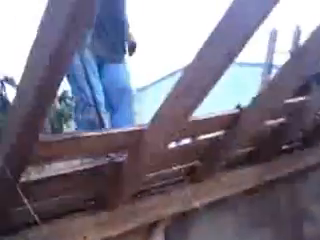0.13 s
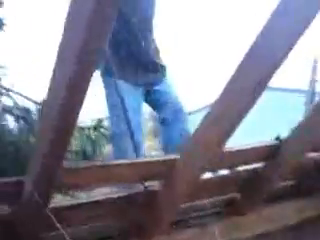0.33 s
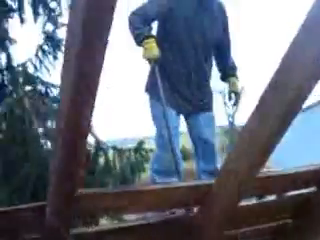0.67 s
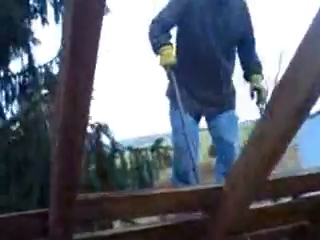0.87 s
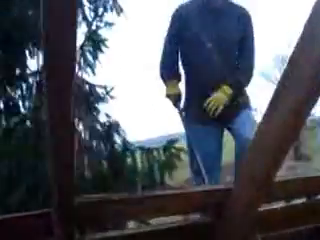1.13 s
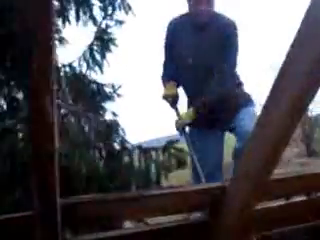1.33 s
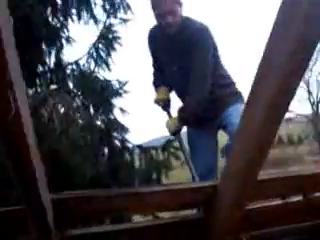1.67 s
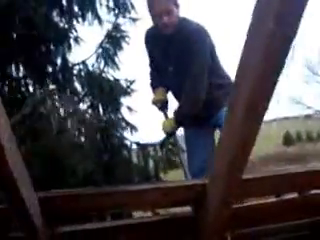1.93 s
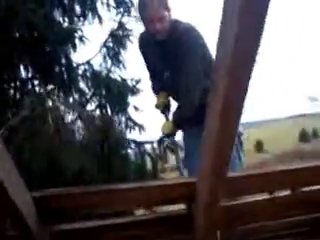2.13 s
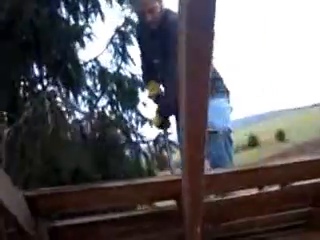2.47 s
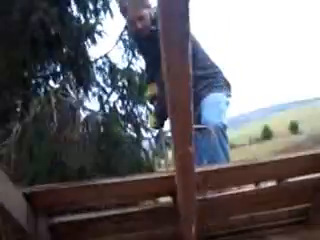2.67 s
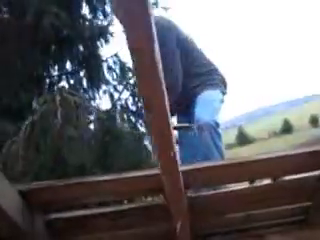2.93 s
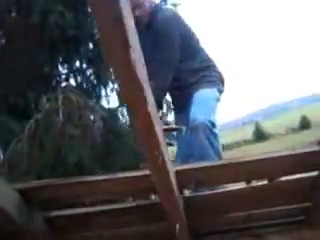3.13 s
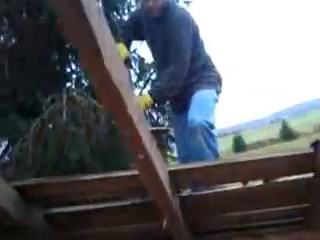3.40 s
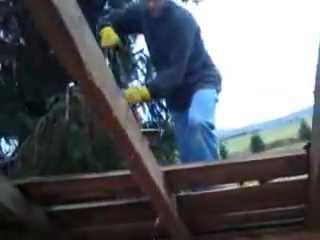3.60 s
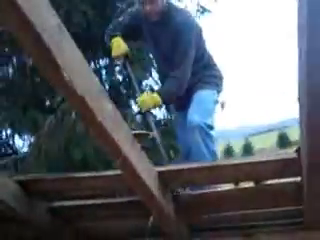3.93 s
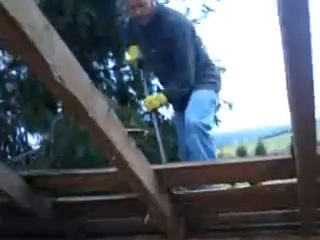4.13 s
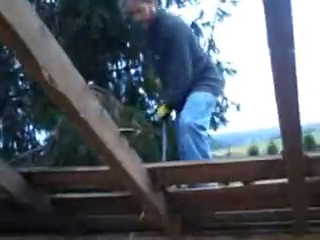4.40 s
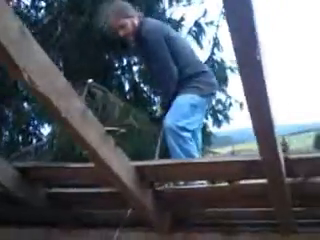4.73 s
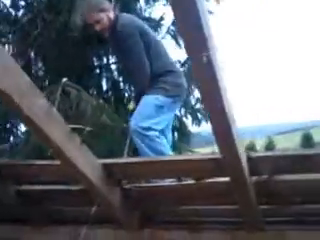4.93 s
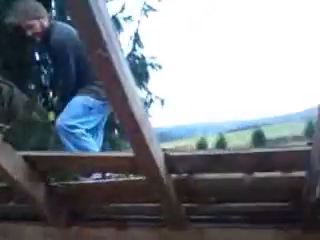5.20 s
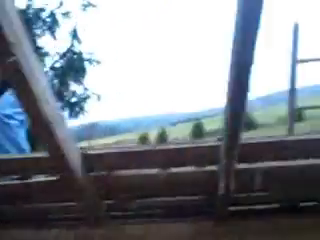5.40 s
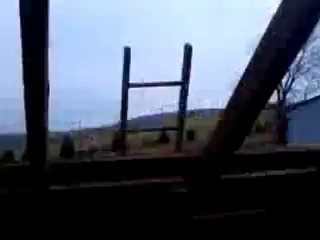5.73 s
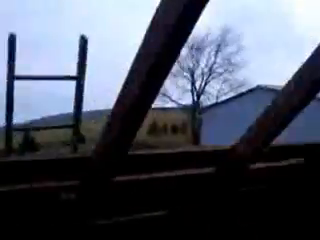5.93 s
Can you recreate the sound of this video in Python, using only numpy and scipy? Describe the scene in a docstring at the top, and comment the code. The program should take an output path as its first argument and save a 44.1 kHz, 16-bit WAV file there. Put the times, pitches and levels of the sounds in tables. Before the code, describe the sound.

Wooden boards are pried loose from an open barn roof, over uneven scraping of wood on wood and a faint hush of trees. Light knocks and small dry snaps open the first half second. Near 0.9, 1.8 and 2.9 seconds, boards strike the rafters hard, each blow ringing briefly and trailing into a rattle. Smaller knocks and a snap fall around 1.2 seconds, and soft, muffled low bumps join after 2 seconds. From 3.6 seconds to the end, boards fall and clatter in dense clusters, strongest around 3.9 to 4.2 seconds and again from 5 to 5.2 seconds. Wind thumps the microphone most near 5.2 seconds, along with louder scraping. A last hard crack with a low bump lands near 5.9 seconds. The small microphone gives a narrow sound with little treble, and the loudest blows distort slightly.

```python
"""Roof boards of an open barn are prised loose with a bar, over scraping wood and a hush of trees.
Light knocks and dry snaps come first; near 0.9, 1.8 and 2.9 s boards strike the rafters hard and ring.
Muffled low bumps join after 2 s. From 3.6 s to the end, boards fall and clatter in dense clusters;
wind thumps the microphone most near 5.2 s. Its narrow band ends near 5 kHz; the loudest blows clip."""
import sys
import numpy as np
from scipy import signal
from scipy.fft import rfft, irfft, next_fast_len
from scipy.io import wavfile
from scipy.ndimage import uniform_filter1d, map_coordinates

SR = 44100
rng = np.random.default_rng(int(sys.argv[2]) if len(sys.argv) > 2 else 0)


def put_to_file(sound):
    """Save the sound as 16-bit audio at rate SR, in the file named by the first command-line argument."""
    columns = np.atleast_2d(sound).T  # one column per channel
    safe = np.clip(columns, -1, 1)
    whole_steps = np.round(safe * 32767)
    wavfile.write(sys.argv[1], SR, whole_steps.astype(np.int16))


N = 267687

# Wind on the microphone. Each row: time in seconds, thump level in dB.
WIND_LEVELS = [(0.0, -47.5), (1.27, -43), (1.59, -50.5), (2.72, -50.5), (2.84, -44), (3.43, -52),
               (4.16, -40.5), (4.68, -51), (4.95, -49), (5.15, -26), (5.58, -49), (6.07, -42.5)]
# Wind thump spectrum. Each row: frequency in Hz, density in dB.
THUMP_SPECTRUM = [(15, -33), (40, -23.5), (150, -10.5), (220, -5.5), (300, -5), (420, -12), (600, -6),
                  (1000, -55)]
# Stutters of low bumps. Each row: start in seconds, length in seconds, level in dB, pitch in Hz.
STUTTERS = [(2.145, .005, -28, 234), (2.659, .12, -22.5, 262.4), (2.786, .07, -31.5, 252),
            (3.556, .035, -35, 348), (5.088, .035, -10.5, 298), (5.167, .005, -12.5, 463),
            (5.198, .04, -13.5, 267), (5.285, .03, -16, 306), (5.452, .005, -29, 276),
            (5.654, .005, -26, 263), (5.913, .035, -3, 280), (5.985, .005, -22.5, 253)]
# Spectrum of scraping, also of the trees. Each row: frequency in Hz, density in dB.
SCRAPE_SPECTRUM = [(100, -48), (400, -2), (1000, -2), (1500, -4), (1800, -1.5), (2200, -6.5), (2800, -9),
                   (3350, -5), (3900, -15), (5500, -7.5), (7000, -99.5)]
# Steady shuffling of wood. Each row: time in seconds, level in dB, brightness in dB.
SHUFFLE_LEVELS = [(0.0, -38.5, 4.5), (0.71, -40, 3), (1.01, -35, 6.5), (1.5, -51, 12), (1.99, -42, 12),
                  (2.33, -48, 7.5), (2.96, -41, 9.5), (3.06, -34, 1.5), (3.48, -40.5, 9), (3.63, -42, 3),
                  (4.11, -31, 0), (4.72, -43.5, 0.5), (4.99, -43.5, 12.5), (5.14, -23.5, -8),
                  (5.55, -36.5, 5), (6.07, -33, 5)]
# Wood dragged over wood. Each row: start in seconds, length in seconds, level in dB, brightness in dB.
DRAG_STROKES = [(0.34, 0.078, -35.5, 1.5), (0.717, 0.17, -41, 4), (1.016, 0.21, -43.5, -9.5),
                (1.32, 0.076, -42.5, 0), (1.475, 0.056, -38.5, -4), (1.696, 0.12, -48, -4.5),
                (2.065, 0.049, -47, -5), (2.184, 0.046, -40, 1.5), (2.463, 0.071, -32, 7.5),
                (2.681, 0.05, -32.5, 0), (3.785, 0.069, -34.5, 5.5), (4.107, 0.078, -38.5, 4.5),
                (4.258, .1, -27, 6), (4.708, 0.019, -43, 7.5), (4.794, .1, -49.5, 16),
                (5.051, 0.15, -24.5, 10.5), (5.476, 0.16, -54, -15), (5.895, 0.043, -19.5, -11)]
# Dry snaps. Each row: time in seconds, level in dB, relative level of the low knock in dB.
SNAPS = [(0.4823, -16, -18), (0.6547, -29, -34), (0.693, -24.5, -23), (1.2496, -7, -24),
         (1.785, -21, -21.5), (1.796, -9, -34)]
# Modes of board and beam. Each row: multiple of the pitch, width as a share of the pitch, level in dB.
WOOD_MODES = [(.78, 0.091, 0), (1, 0.06, 7.5), (1.22, 0.14, -2), (1.55, 0.037, 3), (1.9, 0.25, -14)]
# Blows of a board on a beam. Each row: time in seconds, level in dB, board, beam and crack pitch in Hz,
# board, thud and crack level over the beam in dB, chatter T60 in seconds.
BLOWS = [(0.026, -12.5, 1110, 676, 2050, -5, -3, 1, 0.068),
         (0.151, -20.5, 1660, 720, 2780, -9, -1, -23, 0.046),
         (0.236, -11.5, 1340, 796, 2360, 5, -8.5, 4, 0.06),
         (0.358, -24.5, 1800, 520, 1800, 8, 6, -9, 0.096), (0.431, -19, 1350, 554, 2330, 6, -1, 12, 0.065),
         (0.765, -22, 1730, 590, 3120, -12.5, -11, -2, 0.12),
         (0.874, 6.5, 1040, 667, 2420, 3.5, -2, 6, 0.055), (0.894, -2, 1030, 816, 1790, 10, 9, -6.5, 0.032),
         (0.91, -0.5, 1780, 744, 1810, 6, -14, -13, 0.058),
         (0.928, -8.5, 1140, 737, 1830, 5, -5.5, -2, 0.063),
         (0.978, -13, 1140, 885, 2180, 2.5, -35, -1, 0.064),
         (1.136, -7, 1250, 490, 2460, 11, -13, 1, 0.025), (1.146, -8.5, 1090, 879, 1740, 1.5, 3, -3, 0.078),
         (1.188, -21, 1150, 535, 2350, -13, 11.5, 9.5, 0.054),
         (1.497, -22, 1100, 695, 1870, -2, -10, 2, 0.099), (1.548, -17, 1750, 716, 2120, 1.5, 0, -2, 0.077),
         (1.823, 6, 1130, 878, 3010, 7.5, -14.5, 11, 0.097),
         (1.871, -8, 1130, 501, 2910, 6.5, 1.5, 5.5, 0.11),
         (1.927, -19.5, 1780, 900, 1870, 14.5, 10, -2, 0.14),
         (2.638, -22.5, 1340, 634, 1820, 3.5, -9, -1, 0.043),
         (2.882, -11, 1340, 552, 1890, 7, -16, -1, 0.067),
         (2.941, 8.5, 1150, 1023, 2480, 4.5, -10.5, 7.5, 0.081),
         (2.983, 3.5, 1730, 587, 1916, 4, -11.5, 8.5, 0.067),
         (3.161, -10, 1740, 603, 1940, 8, -11, -11, 0.1),
         (3.173, -3, 1140, 826, 2060, 3, 1.5, -10.5, 0.073),
         (3.378, -15, 1020, 1004, 1970, -1.5, -24, 5.5, 0.1),
         (3.424, -24, 1470, 890, 2030, 5, -8, 2, 0.067), (3.628, -10, 1353, 824, 1770, 5, -11.5, -8, 0.11),
         (3.639, -1, 1760, 641, 2250, -5, -9, -13.5, 0.066),
         (3.866, -17.5, 1720, 960, 1820, 3.5, -3.5, -7.5, 0.054),
         (3.875, -12, 1760, 720, 1800, 5, -8, 1, 0.052), (3.916, 2.5, 1100, 597, 1800, 4.5, -2.5, 4, 0.11),
         (3.969, -13, 993, 910, 2630, 7.5, 5, -13.5, 0.044),
         (4.072, -2.5, 1340, 885, 2120, -5.5, 0, -10.5, 0.081),
         (4.113, -19.5, 1540, 627, 1800, 4.5, -5.5, -2, 0.06),
         (4.168, 7.5, 1350, 771, 1880, 0.5, 1.5, -0.5, 0.099),
         (4.192, -1.5, 1350, 840, 2020, -9.5, 2.5, -10, 0.16),
         (4.217, -1, 1170, 858, 2060, -1, -6, -4.5, 0.061),
         (4.247, -6, 1180, 848, 2090, -0.5, -11, -1, 0.087),
         (4.489, 0, 1680, 648, 2070, -5.5, -6, -15, 0.075), (4.711, -25.5, 950, 837, 1930, -1, -3, 3, 0.13),
         (4.925, -26.5, 1140, 800, 1990, -2, 1.5, -15.5, 0.11),
         (4.954, -2, 1070, 850, 1890, 5.5, 0, -7.5, 0.079),
         (5.021, -6, 950, 635, 2330, 0.5, -3, -7.5, 0.07),
         (5.043, -13, 991, 960, 1960, 6.5, 8.5, -0.5, 0.037),
         (5.065, 4.5, 988, 535, 2250, -3, -14.5, 2, 0.067), (5.125, 0, 1760, 640, 3260, -8, -4.5, -3, 0.07),
         (5.154, 2.5, 1310, 581, 1900, -5, -7, -6, 0.13), (5.166, 3, 1700, 818, 1770, 0.5, 3.5, -4.5, 0.1),
         (5.211, -18.5, 1270, 464, 1820, 2, -0.5, -10, 0.036),
         (5.278, -5, 1020, 550, 3130, -2, -2.5, 0.5, 0.067), (5.34, -15, 966, 924, 3050, -1, -1, -6, 0.09),
         (5.408, -14, 1060, 825, 3210, 2, 1, -5.5, 0.064),
         (5.436, -16, 1460, 540, 1920, 4.5, -2, -5.5, 0.025),
         (5.526, -4, 1310, 762, 1770, -1, 0.5, -10.5, 0.072),
         (5.568, -15.5, 1590, 595, 1804, 23, -4, -9.5, 0.039),
         (5.655, -25.5, 1520, 544, 1980, 3.5, -9, -1, 0.089),
         (5.738, -1.5, 1190, 832, 1770, -13.5, 1.5, -16, 0.091),
         (5.821, -26.5, 1076, 820, 3290, 7, -6.5, -1, 0.062),
         (5.896, -5, 950, 750, 3230, -4, -2.5, 25.5, 0.21), (5.906, 6, 1540, 768, 2155, -0.5, -2, 1, 0.1),
         (5.964, -2, 1620, 680, 2090, -11, -3, 6.5, 0.03),
         (6.019, -15.5, 1500, 680, 2540, 14, -8, 3, 0.036)]
# Microphone response. Each row: frequency in Hz, gain in dB.
MIC_RESPONSE = [(20, -21.5), (70, -7), (180, -2), (300, 0.5), (3400, -6.5), (3900, -18.5), (4700, -23.5),
                (5000, -43.5), (5300, -67)]
# The microphone's own rumble. Each row: frequency in Hz, density in dB.
RUMBLE_SPECTRUM = [(12, -42), (20, -14), (22, -21.5), (43, -14.5), (150, -3.5), (200, -27), (330, -120)]


def amp(db):
    """Decibels to gain."""
    return 10 ** (np.asarray(db) / 20)


def unit_rms(x):
    """Each row at rms 1."""
    return x / np.sqrt(np.mean(x ** 2, axis=-1, keepdims=True) + 1e-20)


def gain_at(spectrum, hz):
    """Gain from (Hz, dB) points on a log frequency axis."""
    points_hz, db = np.transpose(spectrum)
    return amp(np.interp(np.log(hz + 1), np.log(points_hz + 1), db))


def wobble(rate_hz):
    """Smooth curve through random knots."""
    knots = rng.standard_normal(int(N * rate_hz / SR) + 4)
    return map_coordinates(knots, [np.arange(N) * rate_hz / SR])


def filtered(x, response):
    """Filter x by a function of frequency."""
    size = next_fast_len(N + 8192)
    return irfft(rfft(x, size) * response(np.fft.rfftfreq(size, 1 / SR)), size)[:N]


def shaped(x, spectrum):
    """Filter x by (Hz, dB) points."""
    return filtered(x, lambda hz: gain_at(spectrum, hz))


def resonance(hz, centre_hz, width_hz):
    """Causal response of one mode, 1 at its centre."""
    return 1j * hz * width_hz / (centre_hz ** 2 - hz ** 2 + 1j * hz * width_hz)


def mix_at(sounds, start_s):
    """Sum rows of sound at their start times."""
    index = np.round(start_s * SR).astype(int) + np.arange(sounds.shape[1])
    return np.bincount(index.ravel(), sounds.ravel(), N + sounds.shape[1])[:N]


def patchy_noise(depth_db):
    """White noise whose gain drifts in patches of time and frequency."""
    spectra = signal.stft(rng.standard_normal(N), nperseg=256)[2]
    patches = uniform_filter1d(rng.standard_normal(spectra.shape), size=3, axis=0)
    patches = uniform_filter1d(patches, size=10, axis=1)
    return signal.istft(spectra * amp(depth_db * patches / patches.std()), nperseg=256)[1][:N]


def wind():
    """Gusts thump the microphone over a steady hush of trees."""
    gusts = rng.standard_normal(N) * amp(1.5 * wobble(rate_hz=70))
    thump = unit_rms(shaped(gusts, THUMP_SPECTRUM))
    hush = unit_rms(shaped(rng.standard_normal(N), SCRAPE_SPECTRUM))
    thump_db = np.interp(np.arange(N) / SR, *np.transpose(WIND_LEVELS))
    return amp(thump_db) * thump + amp(-46) * hush


def low_bumps(size=2048, max_count=9, gap_s=0.016, scatter_db=1.5, detune=0.22):
    """Soft low pushes of a few cycles each, in uneven stutters."""
    start_s, length_s, db, pitch_hz = np.transpose(STUTTERS)[:, :, None]
    time_draw, level_draw, pitch_draw = rng.standard_normal((len(STUTTERS), 3, max_count)).swapaxes(0, 1)
    phase = rng.random((len(STUTTERS), max_count))
    delay_s = np.arange(max_count) * gap_s
    heard, repeat = delay_s <= length_s, delay_s > 0
    time_s = (start_s + delay_s + repeat * gap_s / 5 * time_draw)[heard, None]
    gain = amp(db - scatter_db * level_draw)[heard, None]
    hz = (pitch_hz * np.exp(detune * repeat * pitch_draw))[heard, None]
    t = np.arange(size) / SR
    swell = t / 0.0033 * np.exp(1 - t / 0.0032)
    return mix_at(gain * swell * np.sin(2 * np.pi * (hz * t + phase[heard, None])), time_s - 0.002)


def scraping(split_hz=1600, attack_s=0.02, t60_s=0.24):
    """Wood rubs on wood, steadily and in strokes; brightness trades the low band for the high."""
    grit = patchy_noise(depth_db=5) * amp(wobble(rate_hz=100))
    high_share = lambda hz: 1 / (1 + (split_hz / (hz + 1)) ** 4)
    low = filtered(grit, lambda hz: gain_at(SCRAPE_SPECTRUM, hz) * (1 - high_share(hz)))
    high = filtered(grit, lambda hz: gain_at(SCRAPE_SPECTRUM, hz) * high_share(hz))
    t = np.arange(N) / SR
    time_s, steady_db, tilt_db = np.transpose(SHUFFLE_LEVELS)
    steady, tilt = amp(np.interp(t, time_s, steady_db)), amp(np.interp(t, time_s, tilt_db))
    start_s, length_s, stroke_db, bright_db = np.transpose(DRAG_STROKES)[:, :, None]
    grid_s = t[::64]
    attack = np.clip((grid_s - start_s) / attack_s, 0, 1)
    strokes = attack * amp(stroke_db - 60 * np.maximum(grid_s - start_s - length_s, 0) / t60_s)
    low_gain = steady / tilt + np.interp(t, grid_s, np.sum(strokes * amp(-bright_db), axis=0))
    high_gain = steady * tilt + np.interp(t, grid_s, np.sum(strokes * amp(bright_db), axis=0))
    return (low * low_gain + high * high_gain) / np.std(low + high)


def snaps(size=2048):
    """Splinters or nails snap: a few ms of force into three hard resonances and a low knock."""
    time_s, db, knock_db = np.transpose(SNAPS)[:, :, None]
    t, hz = np.arange(size) / SR, np.fft.rfftfreq(size, 1 / SR)
    force = unit_rms(rng.standard_normal((len(SNAPS), size)) * t * np.exp(-t / 0.00068))
    hard = resonance(hz, 3370, 350) - 0.57 * resonance(hz, 1970, 500) - 1.1 * resonance(hz, 5300, 400)
    knock = amp(knock_db + 11) * resonance(hz, 550, 510)
    return mix_at(amp(db - 2) * irfft((hard + knock) * rfft(force), size), time_s - 0.0015)


def wood_response(hz, pitch_hz):
    """A board or beam rings in modes of alternating sign."""
    return sum((-1) ** k * amp(db) * resonance(hz, ratio * pitch_hz, width * pitch_hz)
               for k, (ratio, width, db) in enumerate(WOOD_MODES))


def contact_forces(t, db, chatter_t60_s, rattle_t60_s=0.33):
    """Rough faces meet in a chatter of small contacts, then the loose wood rattles on."""
    blow_noise, rattle_noise, roughness = rng.standard_normal((len(db), 3, len(t))).swapaxes(0, 1)
    lumps = unit_rms(uniform_filter1d(uniform_filter1d(roughness, size=70), size=70)).clip(-2, 1.5)
    rise_s = 0.0023 * amp(0.15 * db)  # heavier blows swell more slowly
    envelope = (1 - 0.86 * np.exp(-t / rise_s)) * amp(-60 * (t / chatter_t60_s) ** 1.325)
    blow = unit_rms(envelope * blow_noise * amp(2.2 * lumps))
    blow /= np.max(unit_rms(envelope), axis=1, keepdims=True)
    blow[:, round(0.0015 * SR)] += 8.5  # one hard opening push
    rattle_db = -12 - 60 * t / rattle_t60_s + 4.15 * lumps
    rattle = (1 - np.exp(-t / 0.028)) * amp(rattle_db) * rattle_noise * (t < 0.3)
    return blow, rattle


def board_knocks(size=16384, rattle_cutoff_hz=2200):
    """Blow and rattle ring board and beam; the rafters add a thud, hard edges a crack."""
    (time_s, db, board_hz, beam_hz, crack_hz,
     board_db, thud_db, crack_db, chatter_t60_s) = np.transpose(BLOWS)[:, :, None]
    t, hz = np.arange(size) / SR, np.fft.rfftfreq(size, 1 / SR)
    blow, rattle = contact_forces(t, db, chatter_t60_s)
    force = rfft(blow) + rfft(rattle) / (1 + 1j * hz / rattle_cutoff_hz)
    thud = amp(thud_db) * (resonance(hz, 319.5, 320) ** 2 + 0.57 * resonance(hz, 76, 160))
    crack = amp(crack_db) * (resonance(hz, crack_hz, 190) + 0.31 * resonance(hz, 2600, 5200))
    body = amp(board_db) * wood_response(hz, board_hz) + wood_response(hz, beam_hz) + thud + crack
    body /= np.sqrt(np.mean(np.abs(body[:, hz < 4000]) ** 2, axis=1, keepdims=True))
    return mix_at(amp(db) * irfft(body * force, size), time_s - 0.002)  # force builds before the peak


def scene():
    """Knocks, snaps and bumps over scraping and wind, in mono."""
    return (board_knocks() + snaps() + low_bumps() + scraping() + wind())[None]


def record(dry):
    """Small camera microphone: narrow band, rumble, clipping, faint hiss, band limit."""
    ceiling, top_hz = 0.99, 16600
    x = shaped(dry[0], MIC_RESPONSE)
    x += amp(-69.5) * unit_rms(shaped(rng.standard_normal(N), RUMBLE_SPECTRUM))
    x /= (1 + np.abs(x / ceiling) ** 30) ** (1 / 30)
    x += amp(-99) * rng.standard_normal(N)
    return filtered(x, lambda hz: np.clip((top_hz - hz) / 900, 0, 1) ** 2)[None]


dry = scene()
out = record(dry)
put_to_file(out)
```